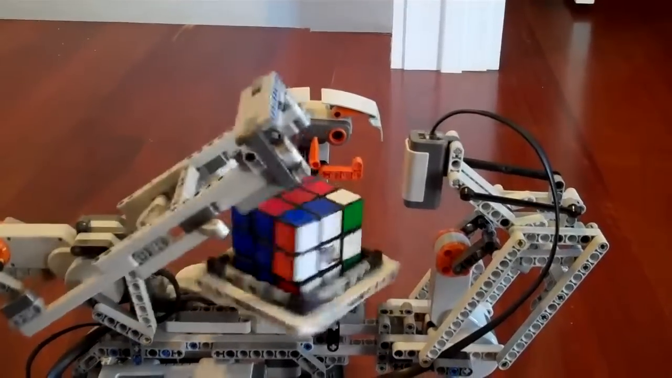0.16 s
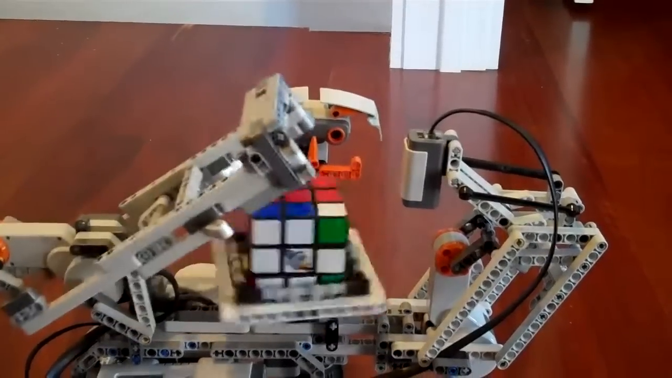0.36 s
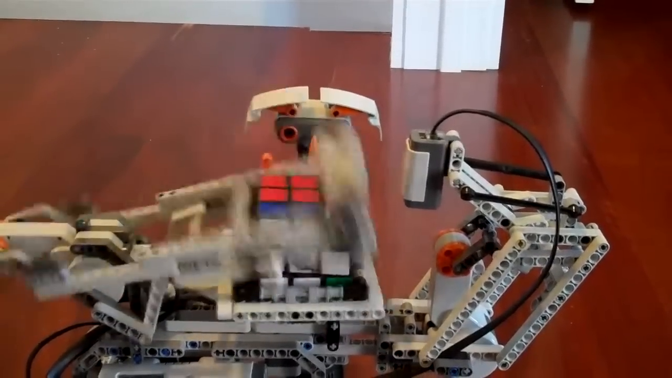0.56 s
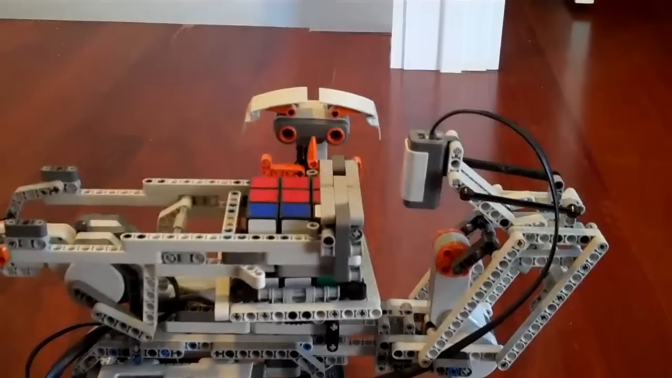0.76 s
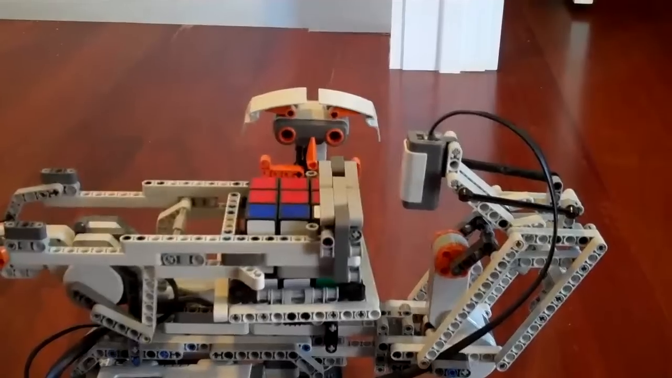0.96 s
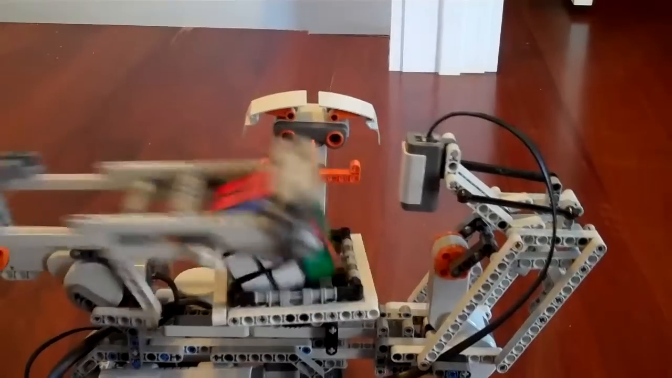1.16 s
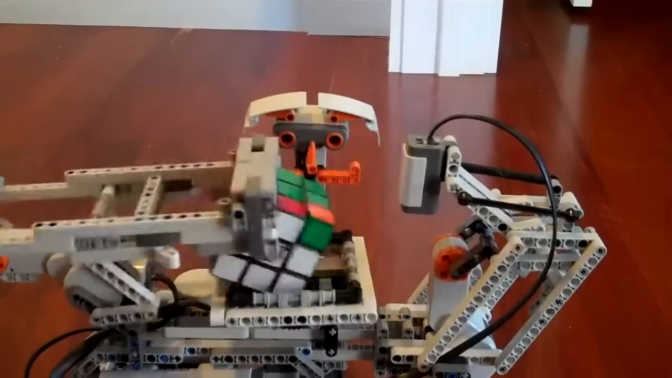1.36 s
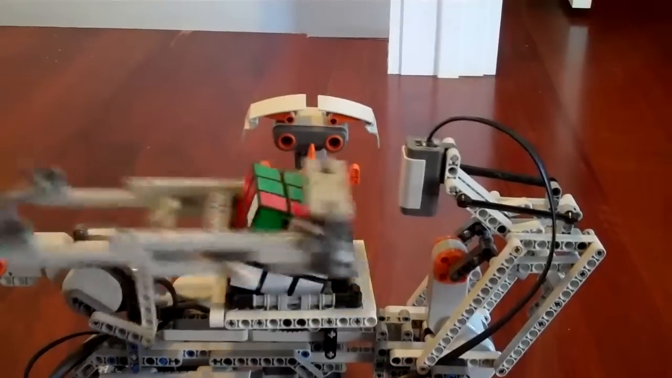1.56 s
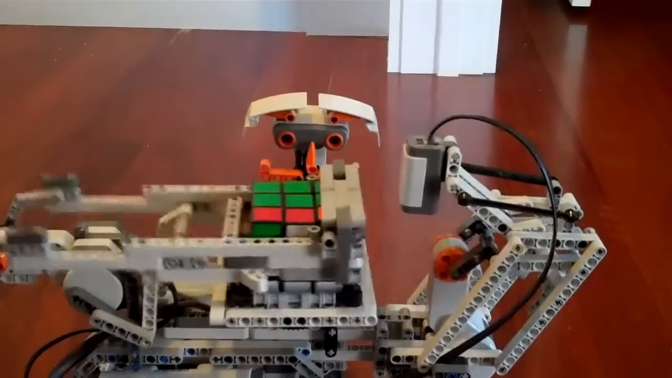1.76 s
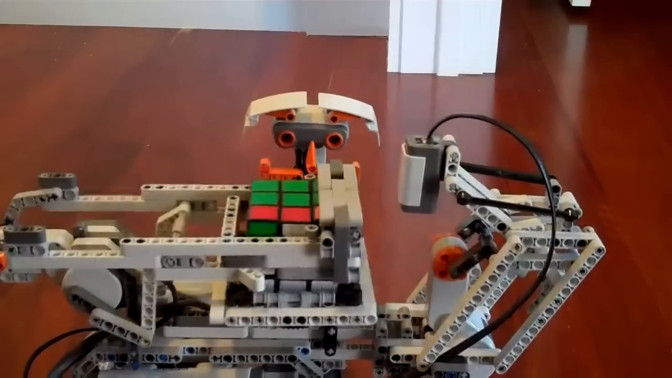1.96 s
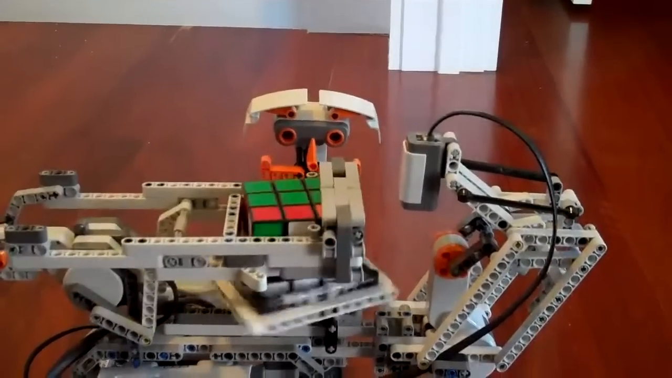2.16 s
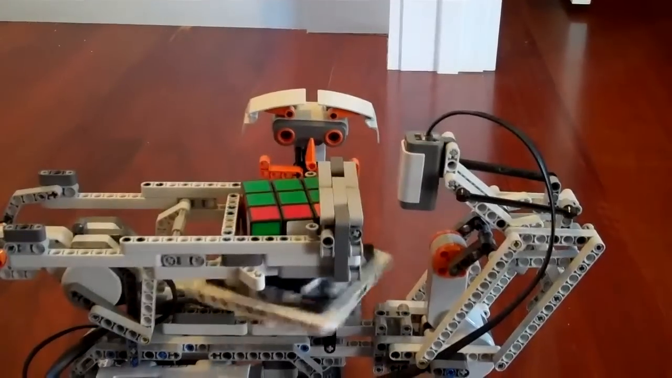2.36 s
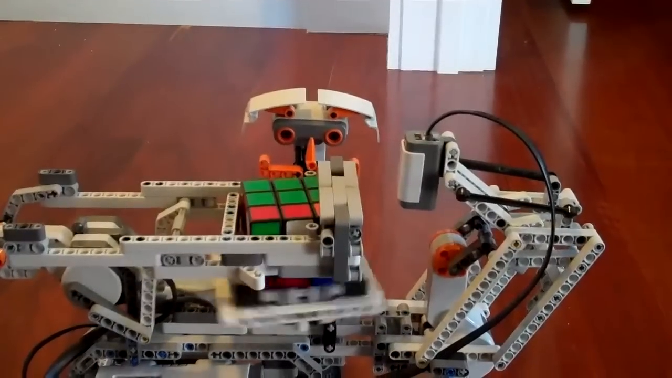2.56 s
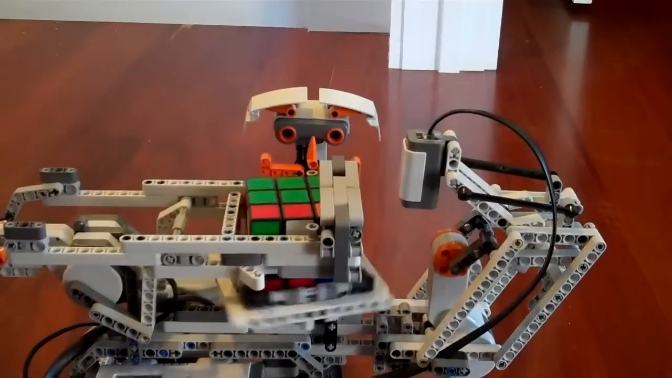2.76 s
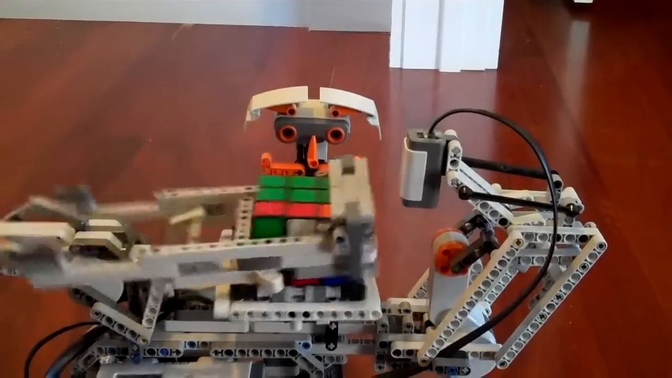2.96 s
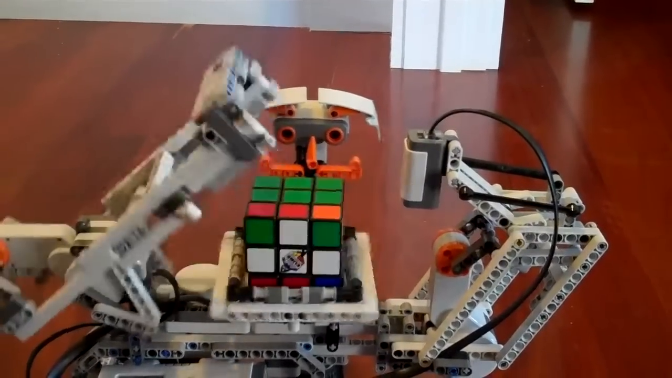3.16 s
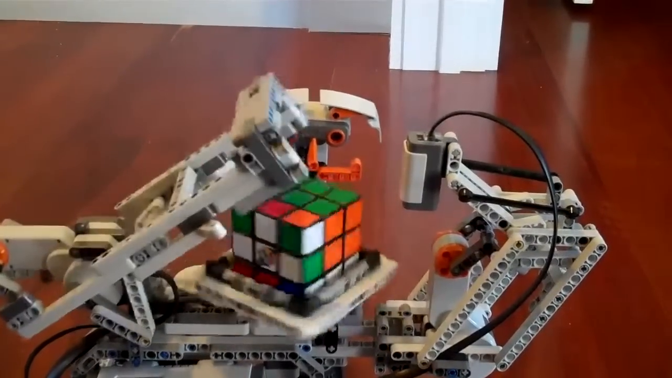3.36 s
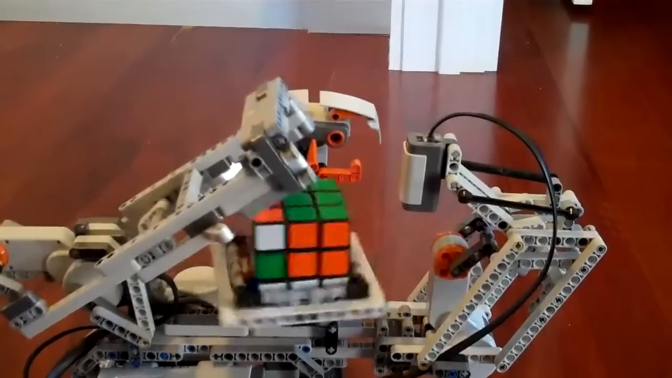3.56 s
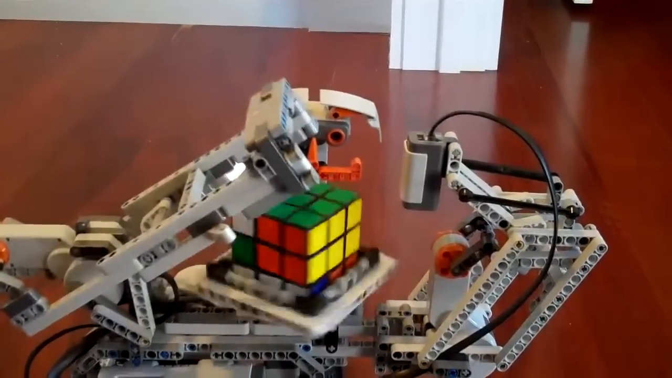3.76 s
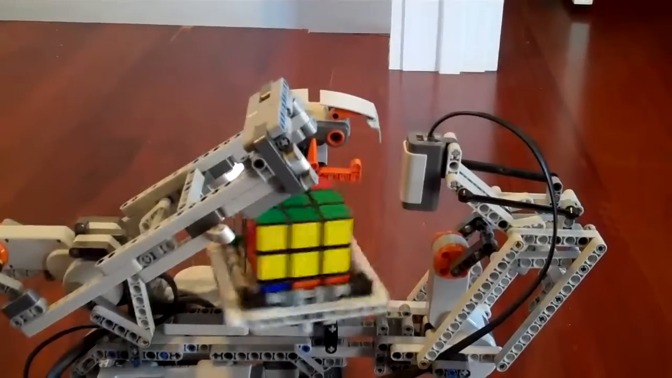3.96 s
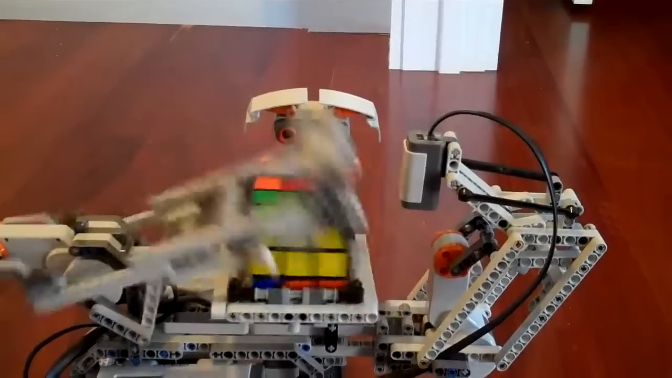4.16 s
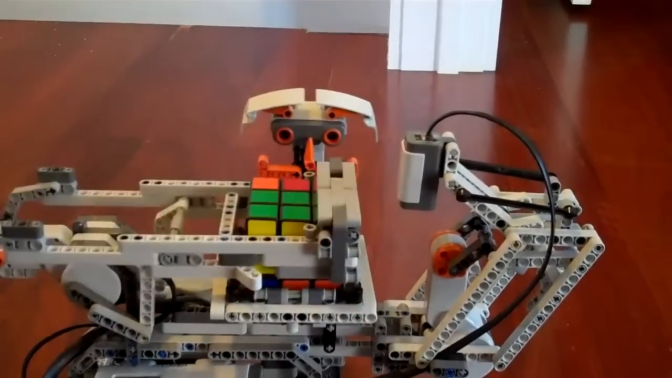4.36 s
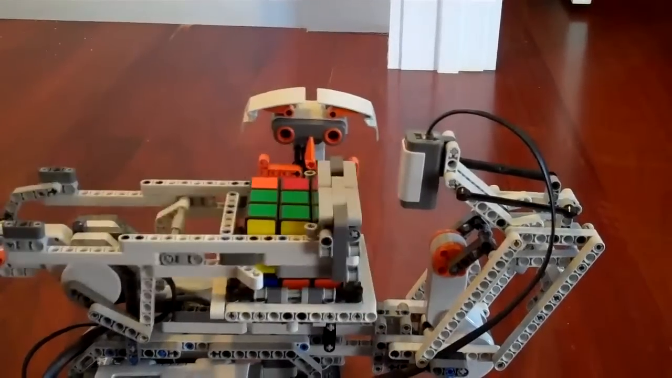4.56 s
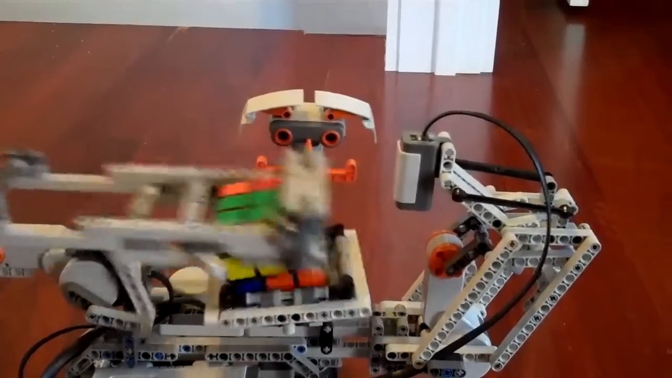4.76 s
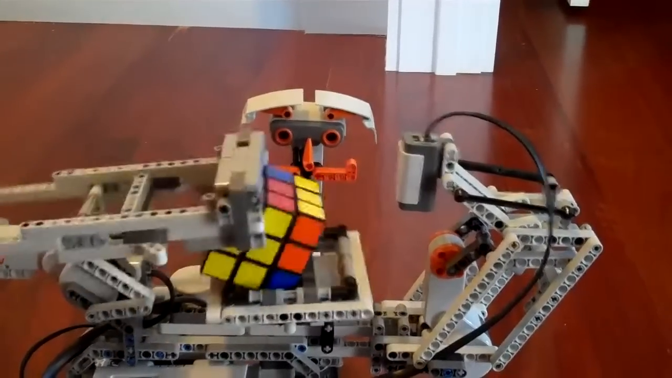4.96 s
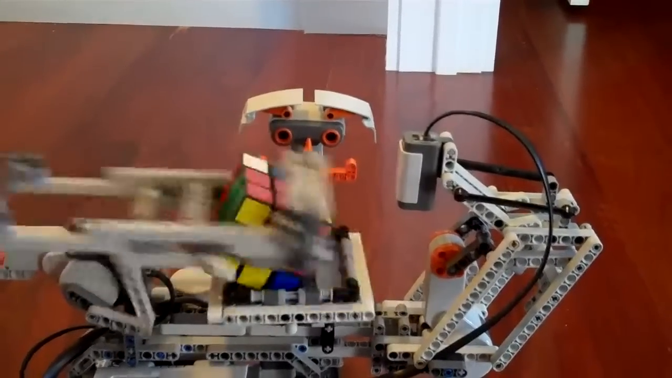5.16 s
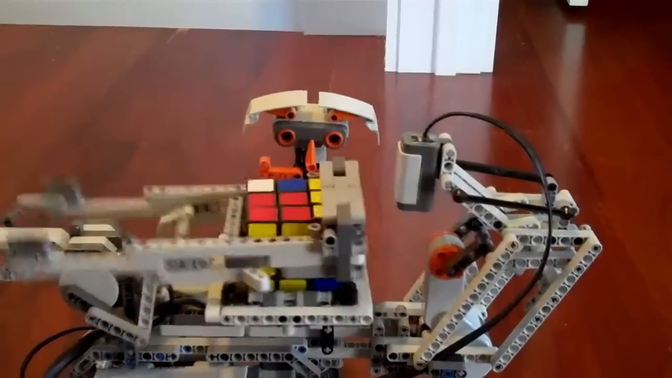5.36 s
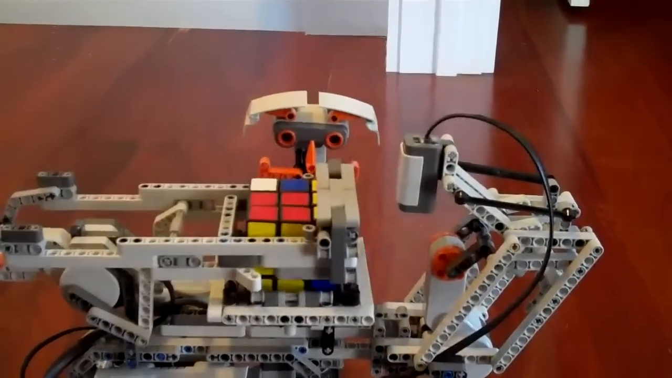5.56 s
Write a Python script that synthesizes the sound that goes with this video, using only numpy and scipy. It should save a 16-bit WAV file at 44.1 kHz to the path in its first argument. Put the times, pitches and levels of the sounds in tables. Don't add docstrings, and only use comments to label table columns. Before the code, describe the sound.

Close stereo pickup of a plastic-brick robot handling a puzzle cube in a bare room. A raspy turntable whir comes first, then short arm-motor zips with hard clacks. Two longer whirs follow, separated by a brief arm burst; a last flurry of zips, knocks and clicks ends it. Faint low household rumble lies beneath.

```python
import sys
import numpy as np
from scipy import signal
from scipy.fft import rfft, irfft, next_fast_len
from scipy.io import wavfile
from scipy.ndimage import uniform_filter1d

SR = 44100
rng = np.random.default_rng(int(sys.argv[2]) if len(sys.argv) > 2 else 0)


def transcribe(signal):
    frames = np.atleast_2d(signal).T
    limited = np.clip(frames, -1, 1)
    pcm = np.round(limited * 32767).astype(np.int16)
    wavfile.write(sys.argv[1], SR, pcm)


def voltage_ratio(decibels):
    exponent = np.asarray(decibels, float) / 20
    return 10 ** exponent


N = 247842
t = np.arange(N) / SR
slow = np.arange(0, N + 32, 32) / SR

# frequency_hz, density_db_per_hz
ARM_CASE = [(290, -64), (500, -34.5), (1150, -14.5), (1250, -15.5), (1780, -10), (3260, -10), (3650, -7),
            (3970, -7.5), (4260, -5.5), (5330, -4.5), (6230, -9), (9240, -16.5), (10500, -24), (11600, -24),
            (14500, -50)]


def level(x, db):
    return x * voltage_ratio(db) / np.sqrt(np.mean(x ** 2))


def noise(apart, from_hz):
    mid, side = rng.standard_normal((2, N))
    side = apart * band(side, from_hz, 20000) + .55 * band(side, 6000, 20000)
    return mid + side * np.array([[1], [-1]])


def on_log(points, hz):
    f, v = np.transpose(points)
    return np.interp(np.log(hz + 1), np.log(f), v)


def colour(x, points):
    size = 2048
    hz = np.arange(size // 2 + 1) * SR / size
    cep = irfft(np.log(voltage_ratio(on_log(points, hz))))
    cep[1:size // 2] *= 2
    cep[size // 2 + 1:] = 0
    response = irfft(np.exp(rfft(cep)))
    return signal.fftconvolve(x, response[None], axes=1)[:, :N]


def band(x, lo_hz, hi_hz):
    return signal.sosfilt(signal.butter(3, [lo_hz, hi_hz], "band", fs=SR, output="sos"), x)


def walk(rate):
    knots = rng.standard_normal(int(N / SR * rate) + 2)
    return 1.22 * np.interp(t * rate, np.arange(len(knots)), knots)


def spells(rows, rest_db, fade_db_per_s):
    held = []
    for start_s, end_s, db in rows:
        outside_s = np.maximum(np.maximum(start_s - slow, slow - end_s), 0)
        held.append(db - fade_db_per_s * outside_s)
    return np.interp(t, slow, np.maximum(np.max(held, axis=0), rest_db))


def turntable_motor():
    # on_s, off_s, full_speed_mesh_hz, level_db, spin_up_s
    moves = [
        (0.045, 0.515, 855.5, -29, .07),
        (2.11, 2.75, 771.5, -25, 0.072),
        (2.84, 2.96, 658.4, -26.5, .05),
        (3.26, 4.14, 859.6, -27.5, .08),
    ]
    # start_mesh_hz, attack_s, fall_db_per_s, loose_whine_db, hum_db, hiss_db, db_per_octave, speed_share_lost
    rule = (500, 0.026, 380, -11, -14.5, -10.5, 7, 0.11)
    # start_s, end_s, whine_over_rattle_db
    load = [
        (2.23, 2.47, -3.5),
        (2.52, 2.74, -7.5),
    ]
    # multiple_of_mesh_rate, level_db
    orders = [(1, -21.5), (2, -6), (3, -7), (4, -2), (5, -4.5), (6, -1), (7, 0), (8, -21.5), (9, -17),
              (10, 0), (11, -2), (12, -21.5), (13, -5.5), (14, -18)]
    # frequency_hz, density_db_per_hz
    case = [(530, -49), (900, -24), (1420, -18), (1690, -13), (1880, -12.5), (2280, -9), (2560, -4),
            (3490, -9.5), (4190, 1.5), (5850, -11), (6710, -8), (7880, -13.5), (9370, -13), (12600, -27),
            (14000, -43.5)]
    return motor(moves, rule, load, orders, case, throb_db=1.0, swell_db=3.5,
                 scatter_db=3, wobble=.006, ring_db=-14)


def arm_motor():
    # on_s, off_s, full_speed_mesh_hz, level_db, spin_up_s
    moves = [(-0.2, 0.0, 545.3, -27.5, .05), (0.58, 0.762, 668, -25, .055), (1.17, 1.32, 711, -27, 0.082),
             (1.542, 1.635, 689.6, -31, .04), (1.635, 1.805, 689.5, -32, .03),
             (1.7, 1.745, 690.2, -26.5, .015), (1.812, 1.9, 641.2, -29, .05), (3.027, 3.195, 754, -24, .04),
             (4.202, 4.378, 650, -25, .055), (4.79, 4.95, 683, -30, .062), (4.955, 5.02, 640, -30.5, .03),
             (5.17, 5.235, 639, -32.5, .06), (5.3, 5.36, 725, -27, .015), (5.35, 5.405, 686, -32, .02),
             (5.445, 5.535, 650, -34, .04)]
    # start_mesh_hz, attack_s, fall_db_per_s, loose_whine_db, hum_db, hiss_db, db_per_octave, speed_share_lost
    rule = (350, .014, 350, -12, -16, -7, 2, 0)
    # start_s, end_s, whine_over_rattle_db
    load = [(.61, .66, 0), (1.235, 1.325, 0), (1.57, 1.6, -6), (1.73, 1.745, -3), (1.85, 1.88, -7),
            (3.11, 3.21, 0), (4.24, 4.285, -3), (4.865, 4.945, 2), (5.2, 5.24, -6), (5.33, 5.36, -1),
            (5.48, 5.53, -7)]
    # multiple_of_mesh_rate, level_db
    orders = [(1, -36), (2, -11.5), (3, -7), (4, -6.5), (5, -4), (6, -5), (7, 1), (8, -3), (9, -2.5),
              (10, -12), (11, -6.5), (12, -9), (13, -8.5), (14, -17.5)]
    return motor(moves, rule, load, orders, ARM_CASE, throb_db=0.9, swell_db=0,
                 scatter_db=2.2, wobble=.006, ring_db=-6)


def motor(moves, rule, load, orders, case, throb_db, swell_db, scatter_db, wobble, ring_db):
    teeth, big_gear_teeth, high_spot_s = 10, 38.3, 2.5
    sag_s, hum_per_load = .12, 0.082
    # low_hz, high_hz
    pinion_ring_hz = (4500, 6000)
    start_hz, attack_s, fall_db_per_s, loose_db, hum_db, hiss_db, db_per_octave, sag = rule

    mesh_hz, level_db = drive(moves, start_hz, attack_s, fall_db_per_s, db_per_octave)
    whine_db = spells(load, loose_db, 600)
    share = voltage_ratio(whine_db)
    mesh_hz = mesh_hz * (1 - sag * uniform_filter1d(share - voltage_ratio(loose_db), int(sag_s * SR)))
    phase = np.cumsum(mesh_hz * (1 + wobble * walk(120))) / SR
    tooth = phase.astype(int)
    worn = rng.standard_normal(teeth)[tooth % teeth]
    chance = rng.standard_normal(N)[tooth]

    throb = throb_db * np.cos(2 * np.pi * phase / teeth) + 1.19 * walk(35)
    since_high_spot = phase - phase[int(high_spot_s * SR)]
    throb += swell_db * share * np.cos(2 * np.pi * since_high_spot / big_gear_teeth)

    ticks = np.zeros(N)
    for k, db in orders:
        ticks += np.cos(2 * np.pi * k * phase + .3 * k * k) * voltage_ratio(db + 3 * walk(45))
    ticks *= voltage_ratio(0.3 * worn + throb)
    ticks += voltage_ratio(ring_db) * band(ticks, *pinion_ring_hz)

    gate = np.exp(-(phase % 1) / 0.83) + 0.55
    rattle = noise(0.36, 2500) * gate * voltage_ratio(scatter_db * chance + 0.25 * worn + throb)
    gears = share * level(ticks, 0) + level(colour(rattle, case), 0)
    gears = gears / np.sqrt(1 + share ** 2)

    whir = level(band(gears, 2000, 7000), 0)
    frame_hum = level(band(gears, 300, 2000), 0) * voltage_ratio(hum_db + hum_per_load * (whine_db - loose_db))
    hiss = level(band(gears, 7000, 16000), 0) * voltage_ratio(hiss_db)
    shaken_floor = level(band(rng.standard_normal(N), 324, 785), -36.5)
    return voltage_ratio(level_db) * (shaken_floor + whir + frame_hum + hiss)


def drive(moves, start_hz, attack_s, fall_db_per_s, db_per_octave):
    attack_steepness, coast_s = 2.2, .7
    speeds, levels = [], []
    for on, off, hz, db, spin_s in moves:
        powered = np.clip(slow, on, off) - on + 1e-6
        coasting = np.maximum(slow - off, 0)
        speed = hz - (hz - start_hz) * np.exp(-powered / spin_s)
        rise = 20 * attack_steepness * np.log10(1 - np.exp(-powered / attack_s))
        louder = db_per_octave * np.log2(speed / speed[-1])
        levels.append(db + rise + louder - fall_db_per_s * coasting)
        speeds.append(speed * np.exp(-np.minimum(coasting, coast_s) / coast_s))
    heard = np.argmax(levels, axis=0)[None]
    speed = np.take_along_axis(np.array(speeds), heard, axis=0)[0]
    return np.interp(t, slow, speed), np.interp(t, slow, np.max(levels, axis=0))


def unit(x):
    return x / np.abs(x).max()


def knocks():
    # start_s, peak_db, thud_db (below 1.7 kHz), ring_hz
    blows = [(0.6745, -5, -21, 4978), (0.7321, 0, -15.5, 5000), (1.2381, -21, -17, 5270),
             (1.3992, -30.5, -18, 2370), (1.479, -21.5, -22, 4570), (1.494, -15.5, -14, 4060),
             (1.6638, -15.5, -27, 5400), (1.7063, -12, -24, 5100), (1.7669, -10, -20, 3600),
             (1.7906, -20.5, -12, 4170), (1.8018, -20, -12, 2154), (3.071, -17, -11, 5840),
             (4.2969, -8.5, -20, 5340), (4.3451, -7.5, -20, 3900), (4.35, -2, -28, 5530),
             (4.8603, -20, -32, 4380), (4.9486, -31, -15, 5716), (5.0193, -24, -18, 4740),
             (5.0931, -20, -17, 5200), (5.3121, -15, -10, 5070), (5.315, -15, -25, 5450),
             (5.3434, -16.5, -20, 4117), (5.3942, -16.5, -17, 4270), (5.408, -32.5, -9, 4114)]
    # start_s, peak_db, ring_hz
    clicks = [(0.4439, -21, 2583), (0.687, -13.5, 5060), (0.869, -35.5, 6000), (0.9266, -34, 5380),
              (1.057, -30.5, 5500), (1.2116, -21, 5560), (1.4347, -18, 4950), (1.642, -23, 5600),
              (1.7365, -13, 4720), (1.762, -16.5, 4520), (1.896, -18.5, 5390), (1.9722, -25, 5250),
              (2.085, -35.5, 5350), (3.0506, -20.5, 4880), (3.2449, -20, 5290), (3.2594, -14.5, 6010),
              (4.4494, -38.5, 5350), (4.4784, -32, 5190), (4.574, -37.5, 5820), (4.8219, -28, 5400),
              (5.1678, -37, 3482), (5.2815, -13, 5900), (5.4461, -38, 3000), (5.461, -15, 6050),
              (5.504, -22.5, 4376)]
    contact_s = 0.00229
    heavy = [(s, db, thud_db, -12, hz) for s, db, thud_db, hz in blows]
    light = [(s, db, -37, -14, hz) for s, db, hz in clicks]
    out, u = np.zeros(N + SR), np.arange(SR // 20) / SR
    for s, db, thud_db, snap_db, hz in heavy + light:
        n = rng.standard_normal((4, len(u)))
        touch = contact_s * (1 + voltage_ratio(db))
        contact = np.minimum(u / 0.00026, 1) * np.exp(-u / (1.48 * touch))

        def fade(t60):
            return contact * np.exp(-np.log(1000) * np.maximum(u - touch, 0) / t60)

        crack = unit(band(n[0] * fade(.008), 1100, 6500))
        ring = unit(band(n[3] * fade(.008), .78 * hz, 1.25 * hz))
        thud = unit(band(n[1] * fade(.02), 950, 1700) + .12 * band(n[1] * fade(.025), 300, 700))
        snap = unit(band(n[2] * fade(.006), 6000, 11500))
        blow = 0.6 * crack + .38 * ring + voltage_ratio(thud_db - 0.5) * thud + voltage_ratio(snap_db) * snap
        i = int(s * SR)
        out[i:i + len(u)] += voltage_ratio(db) * blow
    return out[:N]


def settle():
    # start_s, end_s, level_db
    creeps = [(0, .07, -40.5), (.55, .6, -41.5), (0.8, 1.06, -54.5), (1.06, 1.18, -61), (1.38, 1.56, -44.5),
              (1.93, 2.12, -51.5), (2.78, 2.87, -42), (2.99, 3.04, -46), (4.44, 4.59, -60),
              (4.59, 4.8, -68.5), (5.03, 5.13, -49), (5.23, 5.31, -38.5), (5.4, 5.46, -41.5)]
    sizes = voltage_ratio(2.2 * rng.exponential(size=N))
    slips = noise(.6, 1500) * sizes * (rng.random(N) < .15)
    return level(colour(slips, ARM_CASE), 0) * voltage_ratio(spells(creeps, -110, 399.5))


def room(x, t60, db, cut_hz):
    u = np.arange(int(t60 * SR)) / SR
    decay = np.exp(-np.log(1000) * u / t60) * (u > .001)
    tails = rng.standard_normal((2, SR))[:, :len(u)] * decay
    tails = np.array([band(h, 110.0, cut_hz) for h in tails])
    tails = tails * voltage_ratio(db) / np.sqrt(np.sum(tails ** 2) / 2)
    return signal.fftconvolve(x[None], tails, axes=1)[:, :N]


def floorboards():
    # start_s, pitch_hz, level_db, t60_s
    drops = [(1.8, 250, -52.5, 0.11), (4.3, 360, -47, .12), (4.352, 380, -44, 0.11), (4.37, 205, -59, 0.85),
             (5.094, 420, -48.5, .07), (5.395, 560, -46, .07), (5.45, 205, -54.5, 0.18)]
    out, u = np.zeros(N + SR), t[:SR]
    for s, hz, db, t60 in drops:
        out[int(s * SR):][:SR] += voltage_ratio(db) * np.sin(2 * np.pi * hz * u) * np.exp(-np.log(1000) * u / t60)
    return out[:N]


def house():
    # time_s, level_db
    traffic = [(0.0, -61.5), (0.81, -61.5), (0.85, -65), (4.4, -64), (4.65, -75.5), (5.59, -66),
               (5.62, -75)]
    # centre_s, half_width_s, level_db
    at_s, width_s, passing_db = (3.7, 0.16, -57)
    # frequency_hz, density_db_per_hz
    rumble_shape = [(12, -36), (20, -7.5), (43, 6), (130, -1.5), (173, -4), (265, -8), (325, -7.5),
                    (372, -6.5), (500, -8), (650, -18.5), (1100, -120)]
    # start_s, end_s, level_db
    murmurs = [
        (0.8, 1.2, -60.5),
        (1.2, 4.3, -65.5),
    ]
    # frequency_hz, density_db_per_hz
    air_shape = [(150, -33.5), (250, -5), (296, -6), (316, -25.5), (387, -10.5), (429, -22.5), (466, -10.5),
                 (1060, -10.5), (4310, -14.5), (14000, -47.5)]

    deep = voltage_ratio(np.interp(t, *np.transpose(traffic)))
    rumble = colour(noise(0.44, 15), rumble_shape)
    deep_rumble = level(band(rumble, 15, 100), 0) * deep
    low_rumble = level(band(rumble, 100, 900), 0) * deep * voltage_ratio(0.5)
    swell = np.exp(-((t - at_s) / width_s) ** 2)
    throat = level(band(noise(0.34, 15), 81, 208), passing_db) * swell
    murmur = level(band(noise(0.53, 15), 632, 848), 0) * voltage_ratio(4.3 * walk(13))
    murmur = murmur * voltage_ratio(spells(murmurs, -80, 60))
    mains = voltage_ratio(-75 + 2 * walk(6)) * np.sin(2 * np.pi * 120 * t)
    air = level(colour(noise(.6, 15), air_shape), -62.5)
    return deep_rumble + low_rumble + murmur + throat + mains + air


def scene():
    blows = knocks()
    robot = turntable_motor() + arm_motor() + blows + settle()
    bounce = room(blows, .02, -8, 16000)
    walls = room(robot.mean(axis=0), 0.34, -12.0, 9000)
    return voltage_ratio(0.5) * (robot + bounce) + walls + floorboards() + house()


def low_pass(x):
    return signal.sosfilt(signal.butter(12, 15080, fs=SR, output="sos"), x)


def record(dry):
    # frequency_hz, left_over_right_db
    port_db = [(60, 3.2), (500, 4), (2300, 4.6), (5000, 3), (7200, 3.5), (9000, 1), (10400, 0), (11300, 5),
               (12000, 12), (14000, 16)]
    # frequency_hz, left_lead_rad
    port_rad = [(300, 0), (2500, .25), (5200, .7), (7200, 1.3), (9500, 1.6), (11000, 2.5), (14000, 3)]
    size = next_fast_len(N, True)
    hz = np.arange(size // 2 + 1) * SR / size
    half = voltage_ratio(on_log(port_db, hz) / 2) * np.exp(.5j * on_log(port_rad, hz))
    ports = irfft(rfft(dry, size) * np.array([half, 1 / half]), size)[:, :N]
    ports = np.tanh(0.95 * ports) / 0.85
    ports = signal.sosfilt(signal.ellip(8, .2, 70, 14600, fs=SR, output="sos"), ports)
    return low_pass(ports)


dry = scene()
out = record(dry)
transcribe(out)
```